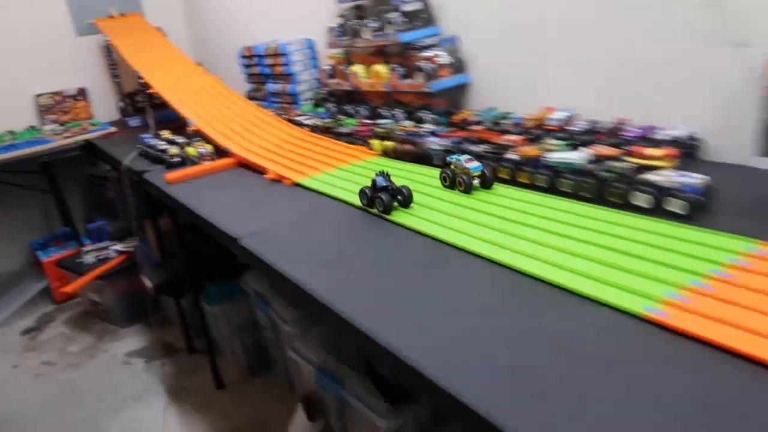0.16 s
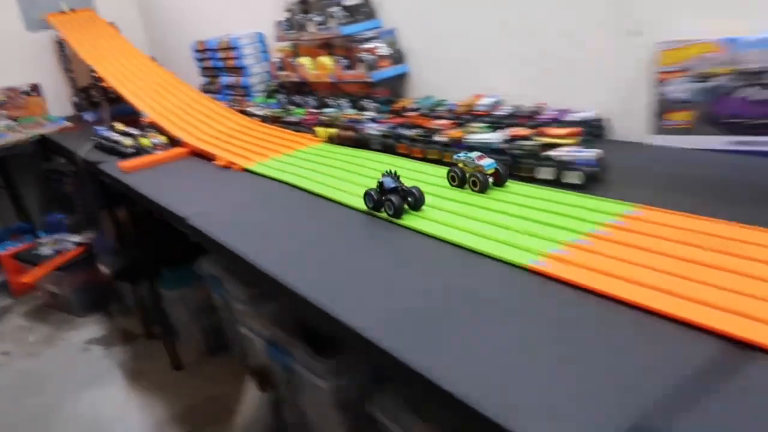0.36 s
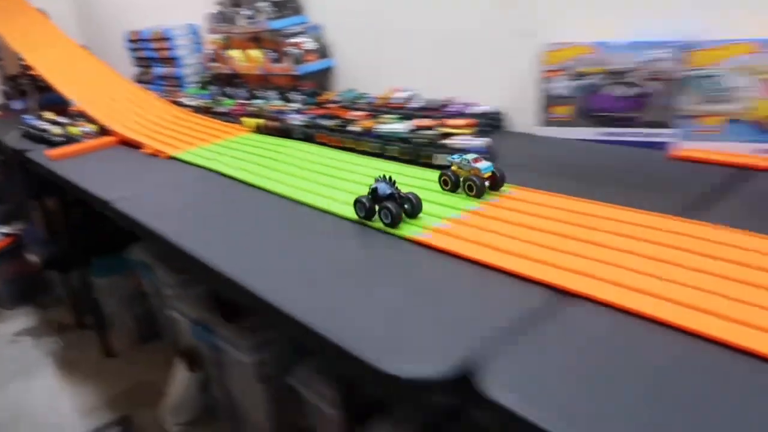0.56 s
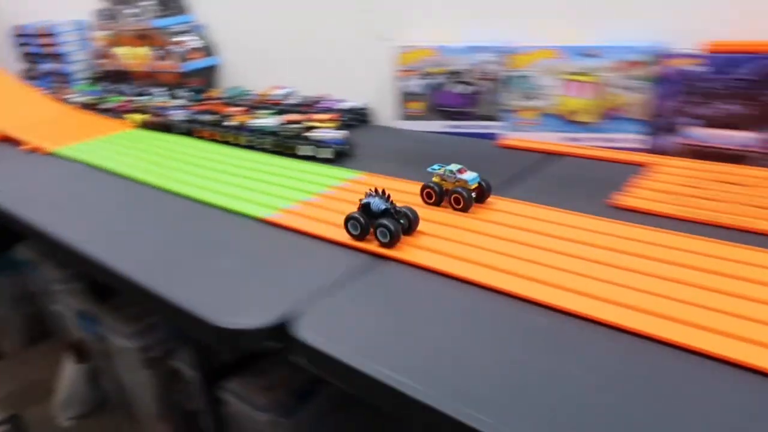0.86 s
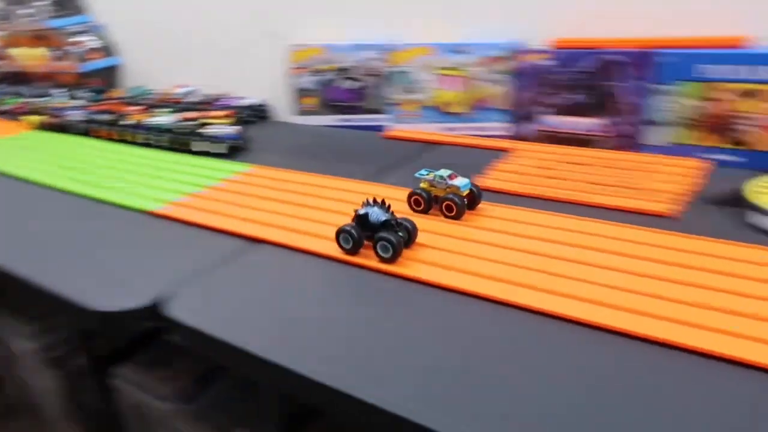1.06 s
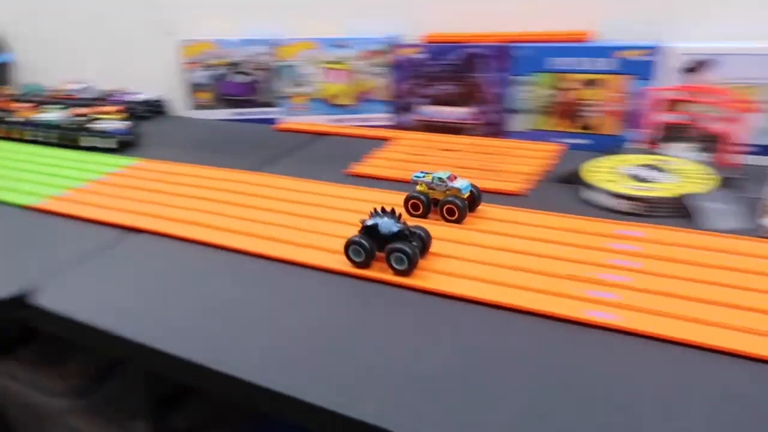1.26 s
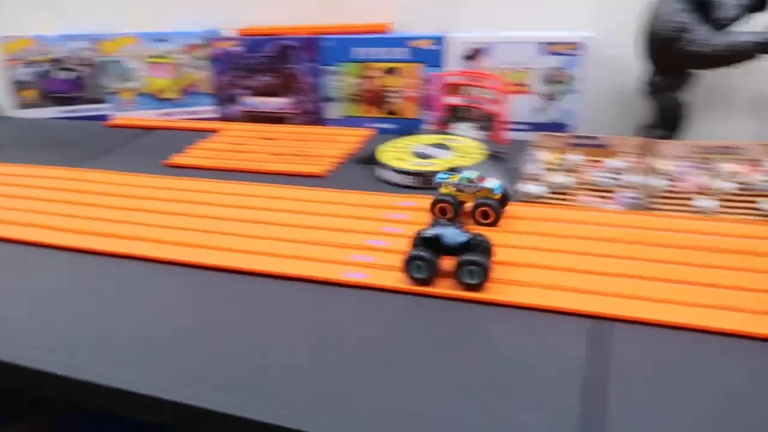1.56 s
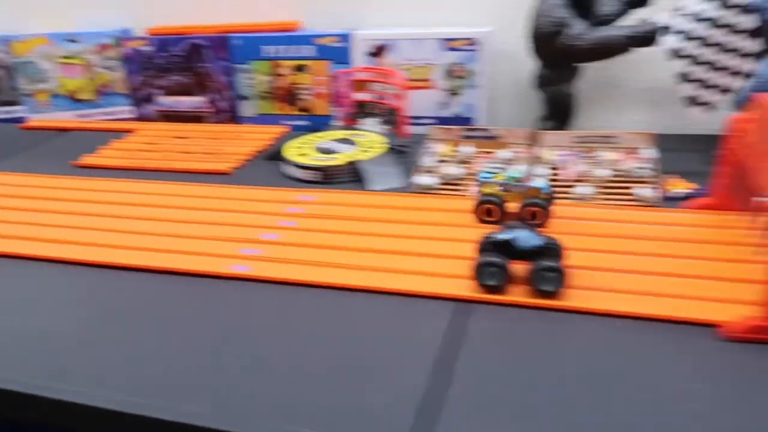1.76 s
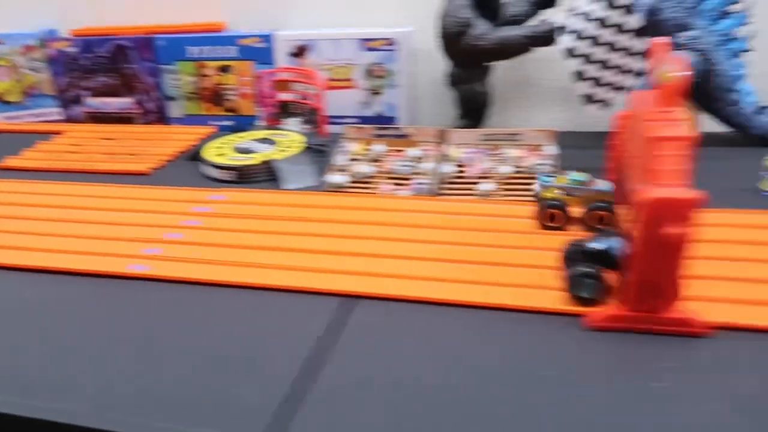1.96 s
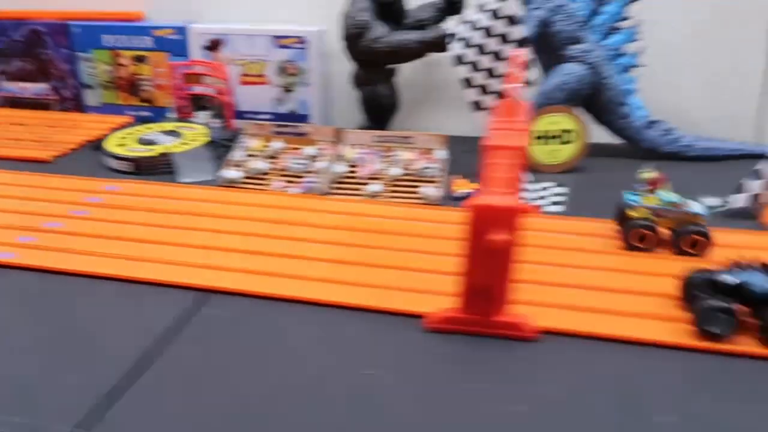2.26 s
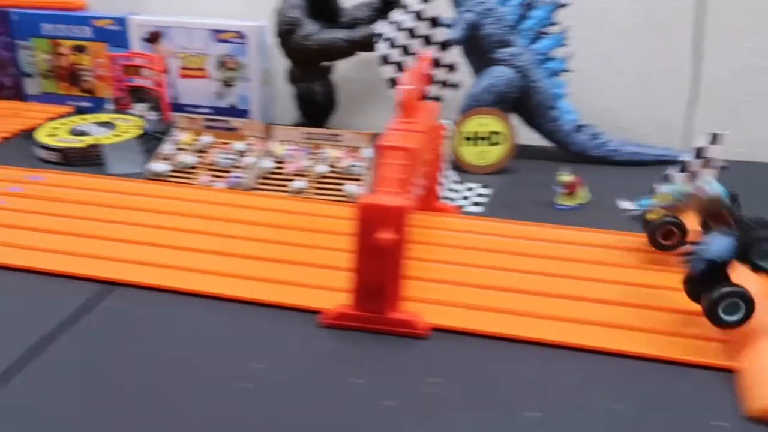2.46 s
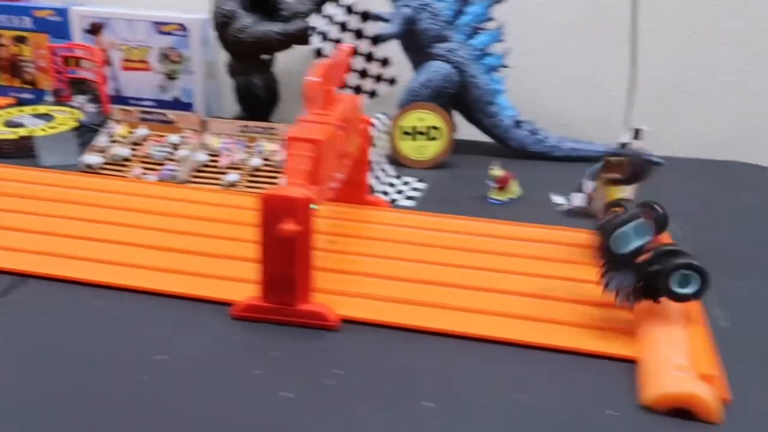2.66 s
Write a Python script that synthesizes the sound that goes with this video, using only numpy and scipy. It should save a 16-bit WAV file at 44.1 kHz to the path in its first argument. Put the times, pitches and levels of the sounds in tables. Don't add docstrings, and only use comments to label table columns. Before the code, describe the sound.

Toy truck wheels rumble loudly down a hollow plastic track, clack through a gate, then crash

```python
import sys
import numpy as np
from scipy import signal
from scipy.fft import rfft, irfft, next_fast_len
from scipy.io import wavfile

SR = 44100
rng = np.random.default_rng(int(sys.argv[2]) if len(sys.argv) > 2 else 0)


def level_to_linear(level):
    exponent = np.asarray(level, float) / 20
    return 10 ** exponent


def generate_wav(signal):
    frames = np.transpose(np.atleast_2d(signal))
    scaled = np.clip(frames, -1, 1) * 32767
    pcm = np.round(scaled).astype(np.int16)
    wavfile.write(sys.argv[1], SR, pcm)


N = 123479

# t/s, level/dB
ROLL = [(0, -19), (.1, -20.5), (.22, -18), (.33, -18.5), (.46, -16), (.61, -20.5), (.78, -18.5), (.92, -21),
        (1.05, -15.5), (1.16, -20), (1.6, -18), (1.77, -20.5), (1.87, -18.5), (1.98, -22.5), (2.06, -17.5),
        (2.32, -17.5), (2.5, -26), (2.8, -28.5)]
# t/s, level/dB
BOOM = [(0, -16), (.06, -23), (.22, -29), (.4, -22), (.62, -22), (.78, -20.5), (.87, -29), (.94, -21.5),
        (1.0, -21.5), (1.1, -22.5), (1.4, -19.5), (1.66, -23), (1.85, -26), (1.97, -20.5), (2.28, -21),
        (2.44, -21.5), (2.54, -32), (2.8, -25)]
# f/Hz, density/dB
TRACK_SPECTRUM = [(88, -39), (150, -4), (230, -0.5), (403, -6.5), (920, -8.5), (1240, -13), (2100, -23),
                  (5930, -42.5), (7720, -55), (10000, -83), (17000, -120)]
# f/Hz, level/dB, t60/s
TABLE_MODES = [(36.4, -7.5, 0.1), (56, -1, 0.53), (71.5, -2, 0.27), (100, -3, 0.44), (122.3, -1.5, 0.19),
               (150.5, -3, 0.17), (176, -1, 0.43), (205, -3, 0.08), (248.5, -12, 0.25), (335, -3.5, 0.19)]
# f/Hz, level/dB, t60/s
TRUCK_MODES = [(350, -12, .03), (620, -13, .015), (900, -1, .014), (1200, -9, .012), (1700, -13, .01),
               (2500, -16, .007), (3300, -22, .005)]
# t/s, peak/dB, f/Hz, swell/s
SINGS = [(0.37, -17, 58.1, 0.069), (.48, -22, 128, 0.049), (0.499, -20.5, 203, 0.096),
         (.75, -25.5, 57.7, 0.046), (1.069, -18.5, 133.7, 0.044), (1.099, -14.5, 59.4, 0.037),
         (1.249, -18, 176, 0.079), (1.248, -18, 58, 0.055), (1.529, -15, 117, 0.067),
         (1.599, -22, 56, 0.051), (2.102, -23.5, 108, 0.057), (2.312, -18.5, 151, 0.026),
         (2.596, -26.5, 100, 0.099), (2.699, -25.5, 176, 0.2), (.2, -31.5, 368, .05),
         (.42, -23, 248, 0.045), (0.559, -20.5, 208.7, 0.04), (0.599, -31.5, 1213, 0.11),
         (.56, -21, 132, .05), (.64, -24.5, 172, 0.049), (.71, -20, 140, 0.035), (.71, -21.5, 193, .05),
         (0.299, -21, 60, 0.025), (1.041, -37, 3310, 0.0098), (.79, -24, 1442, 0.012),
         (1.0, -25.5, 855, 0.035), (1.07, -26, 293, .04), (1.069, -35.5, 2700, 0.018),
         (1.26, -22.5, 241, 0.041), (1.421, -27.5, 161.3, 0.04), (1.57, -23.5, 171.6, .04),
         (1.56, -27.5, 379, 0.041), (1.711, -22.5, 59.2, .03), (1.76, -20, 214, 0.032),
         (1.8, -27.5, 1032, .05), (1.93, -23, 497, .04), (1.95, -19, 165, 0.037), (2.1, -25.5, 337, 0.04),
         (2.27, -24, 659, 0.043), (2.5, -19.5, 100, 0.06), (2.661, -28.5, 337, 0.081)]
# t/s, peak/dB
JOINTS = [(0.042, -23), (0.094, -23.5), (0.154, -11.5), (0.205, -14.5), (.28, -13), (.319, -18.5),
          (.438, -1), (0.48, -13), (0.496, -8.5), (.553, -15), (.611, -14.5), (0.662, -7.5), (.69, -8.5),
          (0.742, -15), (0.785, -2), (0.982, -10), (1.032, -6.5), (1.049, -8), (1.066, -6), (1.08, -7),
          (1.131, -17), (1.179, -4.5), (1.224, -6), (1.255, -13), (1.362, -17), (1.4, -5), (1.606, -9.5),
          (1.644, -3), (1.687, -17.5), (1.761, -27), (1.861, -4.5), (1.891, -18), (1.93, 1.5), (1.979, -13),
          (2.2, -18.5), (2.26, -8.5), (2.29, -18.5)]
# t/s, peak/dB, f/Hz
DROPS = [(0.206, -7.5, 641), (0.318, -8.5, 261), (0.444, -1.5, 347), (0.499, -10.5, 258),
         (0.552, -9.5, 252), (0.607, -10.5, 263), (0.681, -9.5, 250), (0.741, -8, 568), (0.787, -8, 534),
         (1.048, -8, 249), (1.087, -7, 258), (1.132, -8.5, 282), (1.204, -11, 283), (1.224, -10, 253),
         (1.255, -6, 865), (1.325, -7, 290), (1.418, -8.5, 347), (1.486, -3, 342), (1.517, -4, 285),
         (1.643, -10, 605), (1.86, -6, 243), (1.909, -8.5, 251), (1.98, -10.5, 346), (1.998, -5.5, 285),
         (2.016, -8, 346), (2.059, -5, 534), (2.069, -5.5, 615), (2.077, -9, 592), (2.099, -13, 275),
         (2.199, -9, 645), (2.248, -12, 906), (2.248, -5.5, 302), (2.299, -8, 261)]
# t/s, peak/dB
FLAPS = [
    (1.9944, -14),
    (2.0018, -20),
    (2.0168, -11),
    (2.0381, -23),
    (2.0477, -18),
    (2.058, -14),
    (2.0775, -16),
    (2.0986, -18),
    (2.1234, -24),
    (2.142, -20),
]
# t/s, peak/dB
CLACKS = [(2.3495, -20.5), (2.375, -19.5), (2.3995, -19.5), (2.4112, -17.5), (2.427, -19.5), (2.444, -21),
          (2.4795, -23.5), (2.5007, -17.5), (2.518, -33), (2.5986, -30), (2.6232, -31), (2.6607, -30.5),
          (2.728, -24.5), (2.735, -25), (2.746, -23)]
# t/s, peak/dB, f/Hz
THUMPS = [
    (2.353, -5, 56),
    (2.373, -8, 60),
    (2.413, -3.5, 70),
    (2.443, -9, 52),
    (2.463, -10, 56),
    (2.481, -12, 52),
    (2.501, -15, 56),
    (2.52, -16, 59.6),
    (2.787, -7.5, 81.6),
]
# t/s, peak/dB, f/Hz
PINGS = [
    (2.0174, -12, 2040),
    (2.0214, -7.5, 3130),
    (2.0624, -28.5, 3850),
    (2.1274, -7, 3080),
    (2.4274, -13, 3420),
    (2.4987, -9.5, 3660),
    (2.5005, -14, 2130),
    (2.5174, -9, 2100),
]
# f/Hz, direct share of power
LIKENESS = [(50, 0.98), (350, 1), (700, .99), (1400, 1), (2800, 0.92), (5600, 0.19)]

KNOBS_PER_S, KNOB_SPREAD_DB, PATCHY_DB = 2500, 1.2, 0.97
AXLE_HISS_DB, AXLE_FOLLOWS, AXLE_HZ = -57, .3, 5240
THUMP_T60_S, THUMP_SHAKES_DB = 0.046, -18.5
LANDING_S, LANDING_DB = 2.7869, -3
JOINT_T60_S, FLAP_T60_S, CLACK_T60_S, PING_T60_S = 0.051, 0.038, .035, 0.015
JOINT_DB, FLAP_DB, CLACK_DB, PING_DB = -9, 1, -1, -11.5
JOINT_TILT_DB, FLAP_TILT_DB, CLACK_TILT_DB, BRIGHT_TOP_HZ = 0.5, 7.5, 7.5, 5400
KNOCK_RISE_S = 0.002
CRACK_DB, CRACK_T60_S, CRACK_TILT_DB = 1.5, 0.005, 10.5
DROP_DB, DROP_CYCLES = -1.5, 8.5
TUMBLE_FROM_S, CLATTER_DB, CLATTER_SPREAD_DB = 2.44, -33.5, 2
ROOM_T60_S, ROOM_DB = 0.47, -1
ROLL_LAG_S, HIT_LAG_S = 5.5e-5, 8e-5
BALANCE_DB, BALANCE_FROM_HZ = -0.5, 300
AHEAD_DB, ASIDE_DB, HITS_DB, CANCEL_HZ = -1.5, -12, -5, 6000
ASIDE_S, ASIDE_TURN_S = 2.12, .03
LOW_CUT_HZ = 59.6


def rms_one(x):
    return x / np.sqrt(np.mean(x ** 2) + 1e-20)


def in_time(rows):
    return np.interp(np.arange(N) / SR, *np.transpose(rows))


def at_hz(points, hz):
    p = np.array(points)
    return np.interp(np.log(hz + 1), np.log(p[:, 0] + 1), p[:, 1])


def drift(rate_hz):
    r = np.exp(-80 * np.pi * rate_hz / SR)
    noise = rng.standard_normal(N // 40 + 2002)
    slow = signal.lfilter([1], [1, -2 * r, r * r], noise)[2000:]
    return np.interp(np.arange(N) / 40, np.arange(len(slow)), rms_one(slow))


def ring(force, hz, t60_s):
    r, w = level_to_linear(-60 / (t60_s * SR)), 2 * np.pi * hz / SR
    return signal.lfilter([0, np.sin(w)], [1, -2 * r * np.cos(w), r * r], force + 1e-18)


def click(s, db):
    out = np.zeros(N)
    out[min(int(s * SR), N - 1)] = level_to_linear(db)
    return out


def power_decay(power, t60_s):
    return signal.lfilter([1], [1, -level_to_linear(-120 / (t60_s * SR))], power) ** .5


def track_colour(x, tilt_db):
    size = next_fast_len(N)
    hz = np.fft.rfftfreq(size, 1 / SR)
    db = at_hz(TRACK_SPECTRUM, hz) + tilt_db * np.log2(np.clip(hz, 500, BRIGHT_TOP_HZ) / 500)
    low_cut = (hz / 150) ** 2 / (1 + (hz / 150) ** 2)
    return rms_one(irfft(rfft(x, size) * level_to_linear(db) * low_cut, size)[:, :N])


def ports(paths, lag_s, cancel_db):
    size = next_fast_len(N + 64)
    hz, sound = np.fft.rfftfreq(size, 1 / SR), rfft(paths, size)
    alike, side = np.clip(at_hz(LIKENESS, hz), 0, 1), np.array([[.5], [-.5]])
    direct = np.sqrt(alike) * np.exp(-2j * np.pi * hz * side * lag_s) * sound[0]
    both = direct + np.sqrt(1 - alike) * sound[1:]
    cancel = level_to_linear(cancel_db / (1 + (CANCEL_HZ / (hz + 1)) ** 8))
    both = both - both.mean(axis=0) * (1 - cancel)
    balance = level_to_linear(BALANCE_DB * side * hz / (hz + BALANCE_FROM_HZ))
    return irfft(both * balance, size)[:, :N]


def room(x):
    t = np.arange(SR // 2) / SR
    tail = rng.standard_normal((3, len(t))) * level_to_linear(-60 * t / ROOM_T60_S) * (t > .004)
    tail = tail / np.sqrt(np.sum(tail[0] ** 2))
    return level_to_linear(ROOM_DB) * signal.fftconvolve(x, tail, axes=1)[:, :N]


def axle_hiss():
    band_hz = AXLE_HZ * 2 ** np.array([-.5, .5])
    band = signal.butter(2, band_hz, "band", fs=SR, output="sos")
    hiss = signal.sosfilt(band, rng.standard_normal((3, N)))
    force_db = in_time(ROLL)
    return level_to_linear(AXLE_HISS_DB + AXLE_FOLLOWS * (force_db - force_db.mean())) * rms_one(hiss)


def singing():
    t = np.arange(N) / SR
    out = np.zeros(N)
    for s, db, hz, swell_s in SINGS:
        swell = level_to_linear(db) * np.exp(-((t - s) / swell_s) ** 2)
        out += swell * np.sin(2 * np.pi * (hz * (t - s) + rng.random()))
    return out


def table():
    force = level_to_linear(in_time(BOOM)) * rng.standard_normal(N)
    blows = sum(click(s, db + THUMP_SHAKES_DB) for s, db, hz in THUMPS)
    scale = np.sqrt(sum(level_to_linear(db) ** 2 for hz, db, t60 in TABLE_MODES))
    out = np.zeros(N)
    for hz, db, t60 in TABLE_MODES:
        noise_gain = np.sqrt(t60 * SR / 4 / np.log(1000))
        out += level_to_linear(db) * ring(force / scale / noise_gain + blows, hz, t60)
    return out + sum(ring(click(s, db), hz, THUMP_T60_S) for s, db, hz in THUMPS)


def clatter(count=60):
    draws = rng.random((count, 2))
    span_s = N / SR - TUMBLE_FROM_S
    return [(TUMBLE_FROM_S + a * span_s, CLATTER_DB + CLATTER_SPREAD_DB * (2 * b - 1)) for a, b in draws]


def pings():
    return sum(ring(click(s, db + PING_DB), hz, PING_T60_S) for s, db, hz in PINGS)


def landing():
    return sum(ring(click(LANDING_S, LANDING_DB + db), hz, t60) for hz, db, t60 in TRUCK_MODES)


def cracks(rows):
    power = sum(click(s, db + CRACK_DB) for s, db in rows) ** 2
    return power_decay(power, CRACK_T60_S) * track_colour(rng.standard_normal((3, N)), CRACK_TILT_DB)


def knocks(rows, level_db, t60_s, tilt_db):
    power = sum(click(s, db + level_db) for s, db in rows) ** 2
    rise = np.exp(-1 / (KNOCK_RISE_S * SR))
    shape = signal.lfilter([1 - rise], [1, -rise], power_decay(power, t60_s))
    return shape * track_colour(rng.standard_normal((3, N)), tilt_db)


def drops():
    return sum(ring(click(s, db + DROP_DB), hz, DROP_CYCLES / hz) for s, db, hz in DROPS)


def knobs():
    sizes = level_to_linear(KNOB_SPREAD_DB * np.minimum(rng.exponential(1, (3, N)), 5))
    signs = rng.choice([-1, 1], (3, N))
    return sizes * signs * (rng.random((3, N)) < KNOBS_PER_S / SR)


def rolling():
    size = next_fast_len(N)
    drum = rfft(track_colour(knobs(), 0), size)
    octave = np.clip(np.log2(np.fft.rfftfreq(size, 1 / SR) / 150 + 1e-9), 0, 5)
    shared = drift(18.0)
    out = np.zeros((3, N))
    for k in range(6):
        flicker = level_to_linear(PATCHY_DB * (0.49 * shared + 1.27 * drift(10.9)))
        out += flicker * irfft(drum * np.maximum(1 - abs(octave - k), 0), size)[:, :N]
    return level_to_linear(in_time(ROLL)) * rms_one(out)


def scene():
    joints = knocks(JOINTS, JOINT_DB, JOINT_T60_S, JOINT_TILT_DB)
    flaps = knocks(FLAPS, FLAP_DB, FLAP_T60_S, FLAP_TILT_DB)
    clacks = knocks([*CLACKS, *clatter()], CLACK_DB, CLACK_T60_S, CLACK_TILT_DB)
    hits = joints + flaps + clacks + pings() + landing() + cracks([*FLAPS, *CLACKS])
    roll = axle_hiss() + singing() + table() + drops() + rolling()
    aside = .5 + .5 * np.tanh((np.arange(N) / SR - ASIDE_S) / ASIDE_TURN_S)
    ahead_sound = ports(roll * (1 - aside), ROLL_LAG_S, AHEAD_DB)
    aside_sound = ports(roll * aside + room(hits), HIT_LAG_S, ASIDE_DB)
    return ahead_sound + aside_sound + ports(hits, HIT_LAG_S, HITS_DB)


def low_pass(x):
    return signal.sosfilt(signal.butter(12, 7870, fs=SR, output="sos"), x)


def record(dry):
    cut = signal.sosfilt(signal.butter(3, LOW_CUT_HZ, "high", fs=SR, output="sos"), dry)
    return low_pass(np.tanh(cut))


dry = scene()
out = record(dry)
generate_wav(out)
```